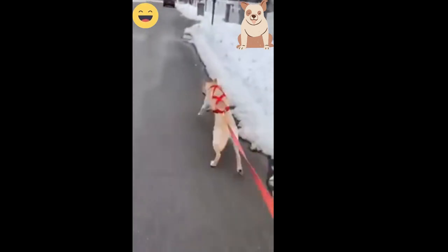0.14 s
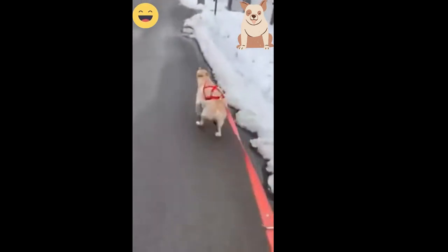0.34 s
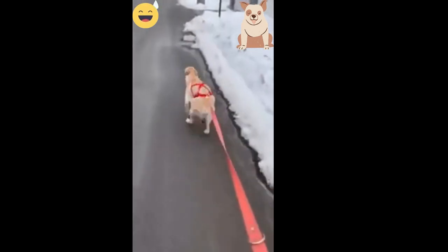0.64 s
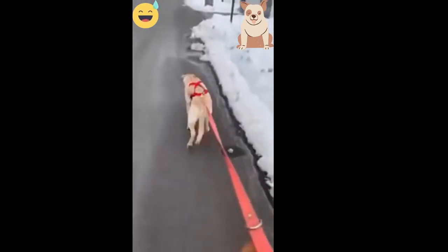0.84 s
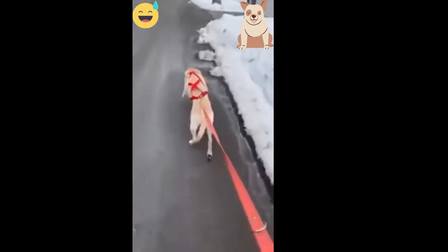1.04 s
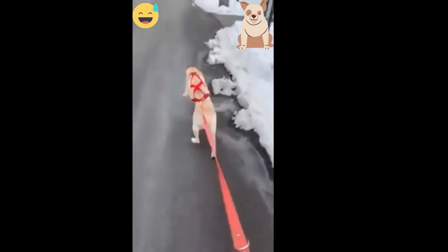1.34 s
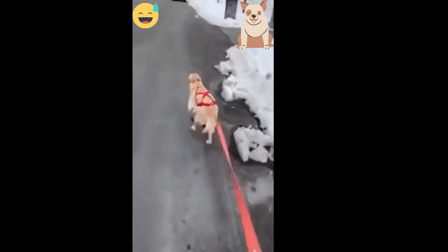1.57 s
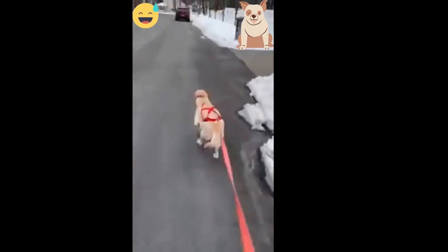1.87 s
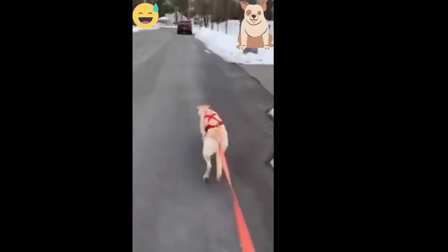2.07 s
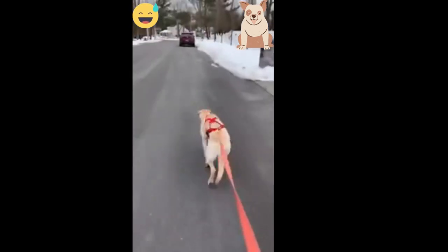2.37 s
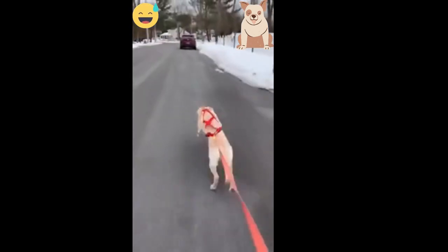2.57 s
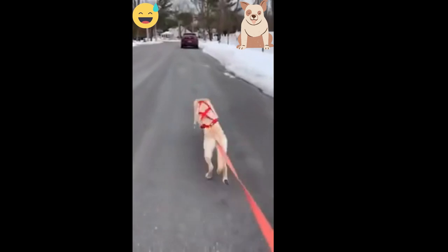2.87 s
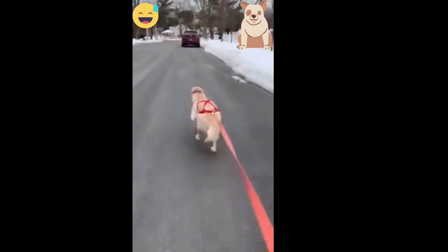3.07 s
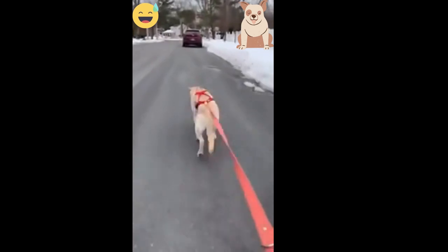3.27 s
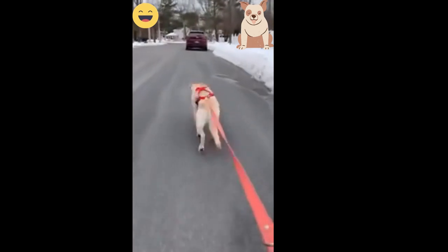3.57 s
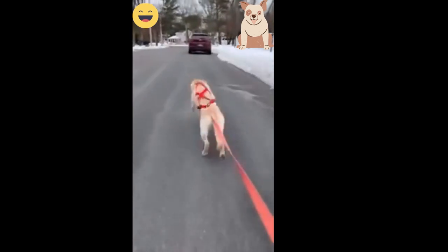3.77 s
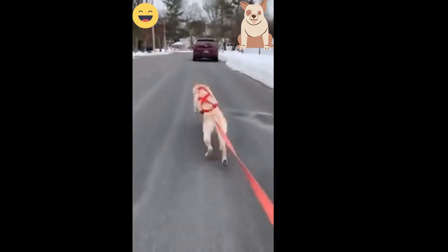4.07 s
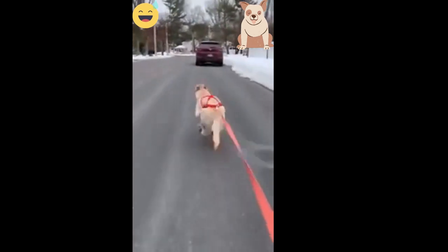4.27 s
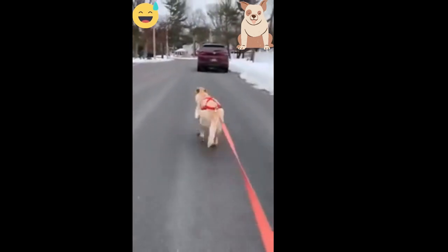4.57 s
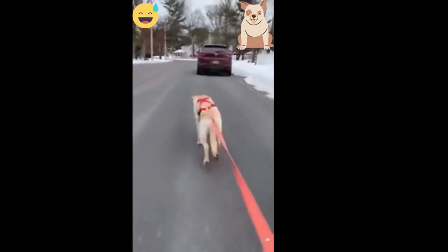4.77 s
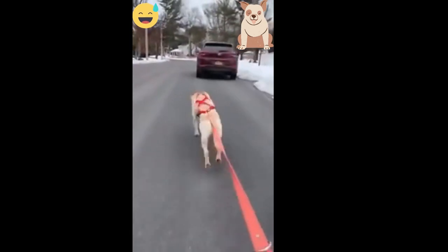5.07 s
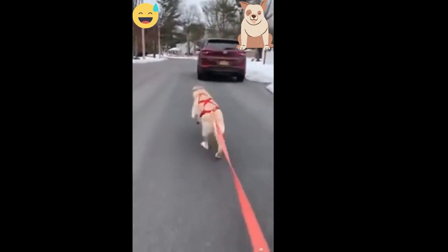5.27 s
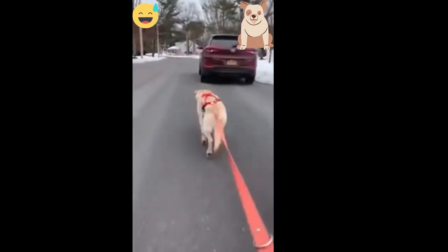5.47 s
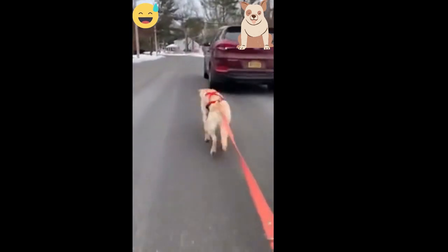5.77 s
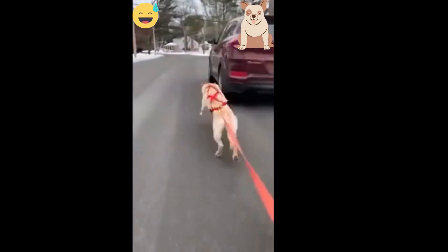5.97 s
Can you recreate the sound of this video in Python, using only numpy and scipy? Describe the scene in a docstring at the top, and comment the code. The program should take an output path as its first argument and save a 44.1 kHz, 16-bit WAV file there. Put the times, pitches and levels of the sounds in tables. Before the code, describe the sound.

A handheld microphone moves quickly behind a leashed dog. Seven clipped, piercing yelps rise, flip higher and drop into a low hook, bouncing lightly off snow banks and houses. A few tiny grunts come between or just before them. Dry claw ticks continue throughout over fine hiss, with faint thin ringing early on. Wind builds from a mild rush to heavy fluttering buffets in the last two seconds.

```python
"""A yelping dog on a fast leash walk

A dog tows its walker fast down an asphalt street, yelping in high, nearly pure arches that echo off the houses.
Each yelp is a gliding tone with a few overtones; delayed and scattered copies make the echoes.
Its claws tick on the road in bursts of noise, and faint thin high ringing tones swell and fade.
Air rushes and buffets the microphone, more strongly later on: coloured noise that swells and flutters."""
import sys
import numpy as np
from scipy import signal
from scipy.fft import rfft, irfft, next_fast_len
from scipy.io import wavfile

SR = 44100
rng = np.random.default_rng(int(sys.argv[2]) if len(sys.argv) > 2 else 0)


def master_out(mix):
    """Clip the mix to full scale and print it as 16-bit PCM to the path in sys.argv[1]."""
    frames = np.transpose(np.atleast_2d(mix))
    ceiling = np.clip(frames, -1, 1)
    pcm = np.round(ceiling * 32767).astype(np.int16)
    wavfile.write(sys.argv[1], SR, pcm)


N = 270333  # length of the scene in samples


def from_db(db):
    """Decibels to gain."""
    return 10 ** (np.asarray(db) / 20)


def rms_one(x):
    """Scale to an rms (average strength) of 1."""
    return x / np.sqrt(np.mean(x ** 2) + 1e-20)


def in_time(rows):
    """Draw straight lines between the rows: one curve for each column after the time."""
    times_s, *columns = np.transpose(rows)
    return [np.interp(np.arange(N) / SR, np.sort(times_s), column) for column in columns]


def at_hz(points, hz):
    """Read a spectrum on a log-frequency axis."""
    point_hz, point_db = np.transpose(points)
    return np.interp(np.log(hz), np.log(point_hz), point_db)


def drift(rate_hz):
    """A smooth random curve of rms 1; a higher rate makes it change faster."""
    # smooth noise at a twentieth of the sample rate, after the filter has settled
    r = np.exp(-40 * np.pi * rate_hz / SR)
    steps = rng.standard_normal(N // 20 + 2002)
    slow = signal.lfilter([1], [1, -2 * r, r * r], steps)[2000:]
    return np.interp(np.arange(N) / 20, np.arange(len(slow)), rms_one(slow))


def swells(rows):
    """A bell-shaped rise and fall for each row; at the half length it is down to 37 percent."""
    t = np.arange(N) / SR
    return sum(from_db(db) * np.exp(-((t - s) / half_s) ** 2) for s, db, half_s in rows)


def band(x, low_hz, high_hz):
    """Keep one band of frequencies with a gentle filter."""
    edges = [low_hz, min(high_hz, SR / 2 - 1)]
    return signal.sosfilt(signal.butter(2, edges, "band", fs=SR, output="sos"), x)


# left-right difference of the noises against their common part: pitch_hz, level_db
NOISE_WIDTH = [(700, -88), (950, -15), (1400, 1), (3000, -10), (6000, -8), (9000, -2), (14000, -7.5)]


def noise(spectrum):
    """Stereo noise of a given colour, alike in both ears in the bass; rms 1."""
    size = next_fast_len(N)
    hz = np.maximum(np.fft.rfftfreq(size, 1 / SR), 1)
    mid, side = rfft(rng.standard_normal((2, size)))
    pair = mid + from_db(at_hz(NOISE_WIDTH, hz)) * side * [[1], [-1]]
    # fade below the first point of the spectrum and well above the last
    low_end = 1 / (1 + (spectrum[0][0] / hz) ** 4)
    high_end = 1 / (1 + (hz / spectrum[-1][0] / 2) ** 4)
    colour = low_end * high_end * from_db(at_hz(spectrum, hz))
    return rms_one(irfft(pair * colour, size)[:, :N])


# base levels of the air stream: time_s, low_buffeting_db, hollow_rush_db
AIR_LEVELS = [(0, -63, -40), (.16, -61, -40), (.23, -63, -54.5), (.33, -72, -38.5), (.49, -69, -42),
              (.57, -63, -42), (.95, -51, -39.5), (1.06, -67, -46), (1.2, -56, -40.5), (1.5, -49, -31.5),
              (2.35, -38, -29), (2.63, -51, -34), (2.76, -50, -31), (2.92, -37.5, -29), (3.25, -39, -27),
              (3.38, -39, -24.5), (3.48, -40.5, -29), (3.6, -37, -26), (3.9, -37, -26.5),
              (4.2, -33.5, -24.5), (4.55, -34, -22.5), (5.0, -31.5, -23), (5.4, -30, -25.5),
              (6.13, -33, -27.5)]
# base level of the brighter rush: nearly gone at 1.25 s, then rising: time_s, level_db
BRIGHT_RUSH_LEVEL = [(0, -57), (.5, -55), (1.25, -88), (1.7, -47), (4.1, -38), (6.13, -36.5)]
# the wind noise is wide at first, then narrows to the centre: time_s, left_right_difference_db
WIND_SPREAD_LEVEL = [(0, -3), (1.22, 3), (1.32, -10), (1.5, -32)]
# dull thumps on the microphone: time_s, level_db, half_length_s
WIND_THUMPS = [(.245, -43, 0.026), (.295, -41.5, 0.042), (.54, -38, 0.012), (2.1, -25, 0.015),
               (2.28, -22.5, 0.0087), (2.41, -24.5, .018), (2.81, -30, 0.02), (2.89, -30, 0.018),
               (3.99, -30, .016), (4.175, -26, .012), (4.245, -25, 0.013), (4.32, -24, 0.023),
               (4.665, -25, .02), (4.72, -20, 0.015), (4.785, -24, 0.013), (4.835, -21, 0.019),
               (5.03, -25.5, 0.032), (5.16, -24, .025), (5.44, -28, 0.023), (5.66, -18.5, 0.014)]
# the sharpest gusts on the microphone: time_s, level_db, half_length_s
SHARP_GUSTS = [(4.808, -29, 0.02), (4.937, -37, 0.014), (4.995, -32.5, 0.013), (5.16, -32.5, 0.0089),
               (5.213, -33, .005), (5.341, -35.5, 0.0078), (5.429, -36, 0.0044), (5.514, -33, 0.007),
               (5.61, -33, 0.0058), (5.655, -22, 0.0045), (5.672, -29, 0.0086), (5.756, -26, 0.004),
               (5.801, -36, 0.0044)]
# colours of the wind noises, each with pitch_hz, level_db (relative)
BUFFET_COLOUR = [(26, -32), (38, -16), (55, -0.5), (90, -10), (130, -5.5), (190, -14.5), (300, -57),
                 (600, -61)]
THUMP_COLOUR = [(34, -23), (50, -5.5), (75, 2), (110, -11), (180, -12.5), (400, -33)]
RUSH_COLOUR = [(100, -15), (180, -8), (270, -2.5), (380, 1), (480, -4), (570, -17), (700, -48), (1000, -70)]
BRIGHT_RUSH_COLOUR = [(350, -14.5), (540, 5), (700, -7), (900, -16), (1150, -20.5), (1500, -41),
                      (2500, -27.5)]
GUST_COLOUR = [(60, 10), (300, 7.5), (700, 2.5), (1100, -2), (1500, -16), (2500, -29.5)]
RUMBLE_DB = -53  # a faint deep rumble that is there all the time


def wind(lump_db=3.5, flutter_db=1.35, bright_flutter_db=2.5, puff_db=-26, puff_spread_db=6):
    """Low eddies thump on the microphone under a hollow rush that brightens later on and in sharp gusts."""
    low_db, rush_db = in_time(AIR_LEVELS)
    (bright_db,), (spread_db,) = in_time(BRIGHT_RUSH_LEVEL), in_time(WIND_SPREAD_LEVEL)
    eddies = drift(38.4)
    layers = [(from_db(low_db + lump_db * drift(23)), BUFFET_COLOUR),
              (swells(WIND_THUMPS) + from_db(RUMBLE_DB), THUMP_COLOUR),
              (from_db(rush_db + flutter_db * eddies), RUSH_COLOUR),
              (from_db(bright_db + bright_flutter_db * eddies), BRIGHT_RUSH_COLOUR)]
    apart = from_db(spread_db) * [[1], [-1]]
    air = sum(gain * (noise(colour) + apart * noise(colour)[0]) for gain, colour in layers)
    # small gusts come at random and grow with the buffeting
    puffs = from_db(low_db + puff_db + puff_spread_db * np.minimum(drift(25), 2))
    return air + (swells(SHARP_GUSTS) + puffs) * noise(GUST_COLOUR)


# gritty road noise, levels before the trims in road(): time_s, middle_db, treble_db
ROAD_LEVELS = [(0, -48, -46), (.6, -54.5, -53.5), (1.2, -55, -54.5), (3.3, -52, -54.5), (4.36, -49, -50.5),
               (4.6, -50.5, -54.5), (5.45, -50.5, -51), (6.0, -42, -49.5)]
# colours of the crunch and the hiss, each with pitch_hz, level_db (relative)
GRIT_COLOUR = [(700, -28), (1200, -1.5), (1700, 4.5), (2200, 2.5), (3000, 2.5), (4000, -2.5), (5000, -7.5),
               (7000, -14.5)]
HISS_COLOUR = [(3500, -51), (5200, 9.5), (6500, 7), (8000, -3), (9500, -6), (11500, 3), (15000, -8.5)]


def road(grit_trim_db=-2.0, hiss_trim_db=-3.0, grain_db=2.5, patch_db=4.5):
    """Fine grit crunches and hisses on the damp asphalt; the treble flickers in patches."""
    middle_db, treble_db = in_time(ROAD_LEVELS)
    grains_db, hiss = grain_db * drift(41), noise(HISS_COLOUR)
    # twelve treble bands flicker separately; neighbours get opposite signs
    edges_hz = np.linspace(4000, 16000, num=13)
    patches = 0
    for k, (low_hz, high_hz) in enumerate(zip(edges_hz, edges_hz[1:])):
        flicker = from_db(patch_db * drift(14.3))
        patches = patches + flicker * band(hiss, low_hz, high_hz) * (-1) ** k
    crunch = from_db(middle_db + grit_trim_db + 0.33 * grains_db) * noise(GRIT_COLOUR)
    return crunch + from_db(treble_db + hiss_trim_db + grains_db) * rms_one(patches)


# soft scuffs: time_s, level_db, half_length_s
SCUFF_TIMES = [(.282, -44.5, 0.019), (.435, -43.5, 0.048)]
# colour of a scuff: pitch_hz, level_db (relative)
SCUFF_COLOUR = [(600, -1), (950, 3), (1400, -2), (2000, -0.5), (2600, -14), (4500, -25)]


def scuffs():
    """Each soft scuff is noise that swells and fades."""
    return swells(SCUFF_TIMES) * noise(SCUFF_COLOUR)


# swells of the thin ringing: time_s, level_db, half_length_s
RINGING_SWELLS = [(.02, -54, 0.039), (.6, -60, 0.027), (1.0, -72, 0.16), (1.72, -70, 0.033),
                  (1.9, -55.5, 0.074), (2.35, -81, .08), (3.1, -64, 0.087)]
# thin high ringing tones: pitch_hz, level_db, ring_s (time to fade by 60 dB)
RINGING_TONES = [(5902, -12, .14), (8267, -12, .2), (8441, 1, .25), (12576, -12, .3), (13954, -20, .25)]


def thin_ringing(impulses_per_s=300):
    """Sparse random impulses set off faint thin high ringing tones that swell and fade."""
    chosen = rng.random(N) < impulses_per_s / SR
    impulses = swells(RINGING_SWELLS) * rng.standard_normal((2, N)) * chosen + 1e-18
    out = np.zeros((2, N))
    for hz, db, ring_s in RINGING_TONES:
        # a two-pole resonator: r sets the fading, w the pitch
        r, w = from_db(-60 / (ring_s * SR)), 2 * np.pi * hz / SR
        out += from_db(db) * signal.lfilter([0, np.sin(w)], [1, -2 * r * np.cos(w), r * r], impulses)
    return out


# footfalls of claws on asphalt, before the trim in paws(): time_s, level_db
CLAW_STEPS = [(0.1156, -37), (0.1795, -54), (0.295, -37), (0.365, -40), (0.415, -42), (0.47, -37),
              (0.602, -38), (0.725, -37), (0.896, -38.5), (1.0276, -41.5), (1.078, -39), (1.204, -42.5),
              (1.3753, -40), (1.5135, -42.5), (1.6038, -44), (1.6475, -39.5), (1.696, -36.5),
              (1.817, -37.5), (2.1226, -41), (2.2553, -43), (2.3106, -43), (2.4239, -42), (2.7232, -43.5),
              (2.8504, -47), (2.9052, -38), (3.028, -40.5), (3.3059, -46), (3.46, -43), (3.512, -40.5),
              (3.6287, -38), (3.7174, -44), (3.8075, -39.5), (3.9275, -41), (4.1081, -43), (4.2178, -44),
              (4.329, -36), (4.358, -34.5), (4.4174, -41), (4.543, -42.5), (4.6713, -41), (4.722, -43.5),
              (4.837, -40.5), (4.949, -40.5), (5.016, -35.5), (5.1991, -41.5), (5.3325, -35),
              (5.5715, -34.5), (5.635, -36), (5.8062, -39), (5.8726, -42), (5.895, -36), (5.9419, -34)]
# colour of a claw scrape: pitch_hz, level_db (relative)
CLAW_COLOUR = [(1200, -7), (3000, 3.5), (6000, 5.5), (8500, -0.5), (12000, 0), (15000, -4.5)]


def paws(t60_s=0.053, touch_s=0.0088, grain_db=5.0, trim_db=-5):
    """Each footfall is a brief, dry, gritty scrape."""
    t, touch = np.arange(N) / SR, np.zeros(N)
    for s, db in CLAW_STEPS:
        near = slice(max(int((s - .03) * SR), 0), int((s + .1) * SR))
        age = t[near] - s - touch_s / 2
        # pressure builds as the paw lands, then dies away
        touch[near] += from_db(db) * np.minimum(np.exp(age / touch_s), from_db(-60 * age / t60_s))
    return from_db(trim_db + grain_db * drift(370)) * touch * noise(CLAW_COLOUR)


YELP_LEAD_S = .1  # the shift of each yelp is counted from this long before its start


def doppler(x, shift):
    """Each yelp as it returns from ahead (positive shift: faster, higher) or behind (slower, lower)."""
    t = np.arange(N) / SR
    starts = np.array(YELP_SHAPES)[:, 0] - YELP_LEAD_S
    age = t - starts[np.searchsorted(starts, t) - 1]
    return np.interp(t + shift * age, t, x)


# echoes from ahead come back sharp, those from behind flat: pitch_shift (share of the pitch), earliest_s, level_db
ECHO_DIRECTIONS = [(.03, .08, -35), (.008, .03, -34), (-.018, .04, -37)]
# colour of the far scatter from trees and snow banks: pitch_hz, level_db (relative)
SCATTER_COLOUR = [(600, -2.5), (1000, 9), (1400, 1), (1750, 11.5), (2100, 7), (6000, -6.5)]
HOUSE_ECHO_S, HOUSE_ECHO_DB = .122, -38.5  # one house front answers distinctly
NEAR_T60_S, NEAR_DB = .16, -23  # scatter from the road and snow banks close by


def street(voice, carried, t60_s=0.72, clump_db=5, scatter_side=0.88):
    """Rough snow banks scatter the voice at once; trees and houses return a thin, wide, uneven tail."""
    t = np.arange(SR) / SR
    hz = np.maximum(np.fft.rfftfreq(SR, 1 / SR), 1)
    colour = from_db(at_hz(SCATTER_COLOUR, hz))
    near = rms_one(rng.standard_normal((2, SR)) * from_db(-60 * t / NEAR_T60_S) * (t > .008))
    out = from_db(NEAR_DB) * signal.fftconvolve([voice], near, axes=1)[:, :N]
    for shift, first_s, db in ECHO_DIRECTIONS:
        mid, side = irfft(rfft(rng.standard_normal((2, SR))) * colour, SR)
        # the tail fades unevenly, in clumps
        fading = from_db(-60 * t / t60_s + clump_db * drift(13)[:SR]) * (t > first_s)
        far = rms_one((mid + scatter_side * side * [[1], [-1]]) * fading)
        out += from_db(db) * signal.fftconvolve([doppler(carried, shift)], far, axes=1)[:, :N]
    house = np.interp(np.arange(N) - HOUSE_ECHO_S * SR, np.arange(N), carried, left=0)
    return out / np.sqrt(SR) + from_db(HOUSE_ECHO_DB) * house


# short grunts in the low register, two of them leading into a yelp; octave level before the throat gain:
# start_s, length_s, start_hz, end_hz, peak_db, octave_peak_db
GRUNT_SHAPES = [(1.66, 0.029, 716, 910, -32, -65), (2.434, 0.026, 737, 867, -28, -31.5),
                (3.046, 0.037, 656, 918, -29.5, -27.5), (4.002, 0.036, 972, 786, -35.5, -48)]
GRUNT_PEAK_SHARE, GRUNT_FADE_DB, GRUNT_HARSH_DB = 0.32, 11, 5


def grunts():
    """Each grunt is one short glide that swells and fades: (samples, pitch Hz, dB, octave dB, harshness dB)."""
    for start, length, start_hz, end_hz, peak_db, octave_db in GRUNT_SHAPES:
        now = np.arange(int(start * SR), int((start + length) * SR))
        share = np.linspace(0, 1, len(now))
        fade_db = np.interp(share, [0, GRUNT_PEAK_SHARE, 1], [GRUNT_FADE_DB, 0, GRUNT_FADE_DB])
        level_db = peak_db - fade_db
        pitch = start_hz + share * (end_hz - start_hz)
        yield now, pitch, level_db, octave_db - fade_db, level_db + GRUNT_HARSH_DB


# yelps, with effort levels before the mouth and throat gains:
# start_s, break_s (jump to the high register), falter_s, fall_end_s, fall_time_s,
# start_hz, before_break_hz, early_top_hz, late_top_hz, falter_hz,
# onset_db, top_db, late_top_db, falter_db, last_push_db, low_hook_db,
# onset_octave_db, later_octave_db (against the effort), top_harshness_db (against the effort),
# side_reflection_db, far_echo_db
YELP_SHAPES = [(-.027, .012, .116, .138, .012, 1240, 1560, 1695, 1720, 1700, -31, -29, -14.5, -20, -35, -24.5, -42, -35, -1, -17, -2),
               (.601, .641, .716, .749, .0135, 1200, 1470, 1690, 1765, 1730, -16, -18, -17.5, -35, -19.5, -23, -31.5, -35, -4, -9, -1.5),
               (1.208, 1.263, 1.3345, 1.363, .0145, 1065, 1550, 1710, 1775, 1620, -15.5, -15, -13.5, -35, -15.5, -32, -38, -38, -5, -8.5, -6),
               (1.856, 1.903, 1.975, 2.001, .0125, 1085, 1335, 1590, 1690, 1460, -15.5, -22, -28.5, -40, -19.5, -23, -36, -33, 0, -18, 1),
               (2.446, 2.498, 2.572, 2.5995, .016, 1185, 1385, 1590, 1740, 1690, -16.5, -18.5, -19.5, -27, -15, -21.5, -38, -37, 3, -20.5, -2),
               (3.075, 3.112, 3.165, 3.2, .0125, 1135, 1275, 1465, 1510, 1560, -16, -15.5, -16.5, -15.5, -18, -29, -42, -37, 4, -17, -5),
               (3.706, 3.7625, 3.811, 3.846, .007, 1048, 1095, 1510, 1355, 1330, -31, -19, -17, -17.5, -26, -35, -25.5, -28, -4, -15, -3)]
# gain of the open mouth on the fundamental: pitch_hz, gain_db
MOUTH_GAIN = [(700, -1), (1150, 0.5), (1280, 7), (1370, 5), (1480, -0.5), (1750, -1.5)]
ATTACK_S, ATTACK_DB, SWELL_DB = 0.0076, 7, 12  # the onset jumps in, then swells up to the break
BREAK_S, SETTLE_S = 0.0012, 0.0064  # a jump between registers: of the pitch, of the effort
DROP_BLUR_S = 0.00222  # the drop back to the lower register is smoother than the break upward
LATE_SHARE = 0.63  # after this share of the top the effort heads for the falter
PUSH_S, PUSH_HOLD_S = 0.0195, 0.0076  # the last push peaks this long before the end, and holds
CATCH_S, CATCH_DB = 0.0093, -28  # the voice catches just before the low hook
HOOK_HZ, HOOK_SAG_HZ_PER_S, HOOK_RISE_S, HOOK_S, HOOK_FADE_DB = 757.4, 4900, 0.0037, 0.011, 27
OCTAVE_ATTACK_S = 0.012  # the octave builds up more slowly than the fundamental
OCTAVE_GAIN_DB, OCTAVE_BREAK_DB = 1, 45  # it gains a little through the rise and collapses at the break
ONSET_HARSH_DB, SWELL_HARSH_DB = 0, -6  # the onset starts harsh and clears as it swells
RELAX_DB, CLOSE_SOFT_DB = 7.5, 9  # the voice softens at the falter, and more in the last push


def arches():
    """Each yelp rises, breaks to a top, falters, and glides through a last push into a low hook.

    Gives (samples, pitch Hz, dB, octave dB, harshness dB)."""
    for (start, jump, drop, end, fall_s, start_hz, jump_hz, top_hz, late_hz, drop_hz,
         onset_db, top_db, late_db, falter_db, push_db, hook_db,
         octave_db, later_octave_db, harsh_db, *_) in YELP_SHAPES:
        now = np.arange(max(int(start * SR), 0), int((end + HOOK_S) * SR))
        t = now / SR
        # smooth switches from 0 to 1 at the break and at the drop
        up = .5 + .5 * np.tanh((t - jump) / BREAK_S / 2)
        down = .5 + .5 * np.tanh((t - drop) / DROP_BLUR_S / 2)
        rise = np.interp(t, [start, jump], [start_hz, jump_hz])
        top = np.interp(t, [jump, drop], [top_hz, late_hz])
        held = (1 - up) * rise + (up - down) * top + down * drop_hz
        # tension lets go toward the end, and the pitch falls to the hook
        tension = 1 - np.exp(np.minimum(t - end, 0) / fall_s)
        pitch = HOOK_HZ + (held - HOOK_HZ) * tension - HOOK_SAG_HZ_PER_S * np.maximum(t - end, 0)
        # stages of the yelp: (s, effort dB, harshness against the effort dB)
        stages = [(start, onset_db - SWELL_DB - ATTACK_DB, ONSET_HARSH_DB),
                  (start + ATTACK_S, onset_db - SWELL_DB, ONSET_HARSH_DB),
                  (jump, onset_db, SWELL_HARSH_DB),
                  (jump + SETTLE_S, top_db, harsh_db),
                  (jump + LATE_SHARE * (drop - jump), late_db, harsh_db),
                  (drop, falter_db, harsh_db - RELAX_DB),
                  (end - PUSH_S, push_db, harsh_db - CLOSE_SOFT_DB),
                  (end - PUSH_S + PUSH_HOLD_S, push_db, harsh_db - CLOSE_SOFT_DB),
                  (end - CATCH_S, CATCH_DB, -RELAX_DB),
                  (end + HOOK_RISE_S, hook_db, -RELAX_DB),
                  (end + HOOK_S, hook_db - HOOK_FADE_DB, -RELAX_DB)]
        stage_s, stage_db, stage_harsh_db = np.transpose(sorted(stages))
        effort_db = 20 * np.log10(np.interp(t, stage_s, from_db(stage_db)))
        octave_change_db = np.interp(t, [start, start + OCTAVE_ATTACK_S, jump], [-ATTACK_DB, 0, OCTAVE_GAIN_DB])
        pressed_db = octave_db + octave_change_db - OCTAVE_BREAK_DB * up
        octave_now_db = np.maximum(pressed_db, effort_db + later_octave_db)
        harsh_now_db = effort_db + np.interp(t, stage_s, stage_harsh_db)
        yield now, pitch, effort_db + at_hz(MOUTH_GAIN, pitch), octave_now_db, harsh_now_db


# level of the upper overtones against the harshness: pitch_hz, level_db
OVERTONE_GAIN = [(2200, -25), (3000, -46), (3500, -36), (3780, -24), (4000, -45), (4400, -67), (5100, -33),
                 (6000, -36.5), (7000, -36), (7800, -72), (8600, -42.5), (10000, -39.5)]
# gain of the throat on the octave: pitch_hz, gain_db
OCTAVE_GAIN = [(1600, -2.5), (2000, -5.5), (2300, -3.5), (2570, 1), (2750, -2), (2900, -10.5), (3100, -3),
               (3450, -6)]
# colour of the breath: pitch_hz, level_db (relative)
BREATH_COLOUR = [(900, -2), (1400, -12), (2000, -12), (2550, 10.5), (3100, -10), (3750, 5), (4500, 2),
                 (6000, -1), (7500, -1), (8600, -38), (10000, -2), (14000, -15)]
OCTAVE_FLUTTER_DB = 1.3  # the pressed octave wavers
OCTAVE_BLUR = .1  # radians; the octave stays much cleaner than the upper overtones


def yelps(jitter=0.0059, shimmer_db=1.27, rough_db=-21, overtone_flutter_db=5.0, overtone_blur=0.29,
          edge_s=0.0018, breath_db=-37, rasp_db=-26):
    """Tight vocal folds whistle up, break higher and drop away; the octave is strong in the pressed onset."""
    out = np.zeros(N)
    wobble, shimmer, flutter, closure = drift(160), drift(75), drift(62), drift(230)
    breath, rattle = noise(BREATH_COLOUR)[0], drift(300)
    for now, pitch, level_db, octave_db, harsh_db in [*arches(), *grunts()]:
        phase = 2 * np.pi * np.cumsum(pitch * (1 + jitter * wobble[now])) / SR
        level = from_db(level_db + shimmer_db * shimmer[now])
        level += from_db(harsh_db + rough_db) * rattle[now]
        octave = from_db(octave_db + at_hz(OCTAVE_GAIN, 2 * pitch) + OCTAVE_FLUTTER_DB * flutter[now])
        voice = level * np.sin(phase) + octave * np.sin(2 * (phase + OCTAVE_BLUR * closure[now]))
        # the folds close unevenly, which blurs the overtones
        uneven = phase + overtone_blur * closure[now]
        for k in range(3, 7):
            overtone_db = harsh_db + at_hz(OVERTONE_GAIN, k * pitch) + overtone_flutter_db * flutter[now]
            voice += from_db(overtone_db) * np.sin(k * uneven)
        # the throat hisses, and the pressed onset rasps
        voice += (from_db(harsh_db + breath_db) + from_db(octave_db + rasp_db)) * breath[now]
        fade = np.clip(np.minimum(now - now[0], now[-1] - now) / SR / edge_s, 0, 1)
        out[now] += np.sqrt(2) * voice * fade
    return out


def scene(bank_delay_s=0.00308):
    """The dog runs just ahead; a near reflection from the side reaches the two channels with opposite signs."""
    t, voice = np.arange(N) / SR, yelps()
    # each yelp has its own side reflection and far echo levels
    reflections = [(s, side_db, far_db) for start, _, _, end, *_, side_db, far_db in YELP_SHAPES
                   for s in (start, end)]
    bank_db, carry_db = in_time(reflections)
    sideways = from_db(bank_db) * np.interp(t - bank_delay_s, t, voice) * [[1], [-1]]
    echoes = street(voice, from_db(carry_db) * voice)
    return wind() + road() + scuffs() + thin_ringing() + paws() + echoes + sideways + voice


# dips of the microphone ports: pitch_hz, width_hz, depth (0 none, 1 full)
MICROPHONE_DIPS = [(4660, 1040, 0.95), (7870, 240, 0.76), (10180, 400, 1), (15400, 500, 0)]
CUTOFF_HZ = 15500


def record(dry):
    """The microphone ports cut narrow dips into the treble; the top is cut off."""
    for hz, width_hz, depth in MICROPHONE_DIPS:
        peak = signal.lfilter(*signal.iirpeak(hz, hz / width_hz, fs=SR), dry)
        dry = dry - min(depth, 1) * peak
    return signal.sosfilt(signal.ellip(10, .1, 90, CUTOFF_HZ, fs=SR, output="sos"), dry)


dry = scene()
out = record(dry)
master_out(out)
```